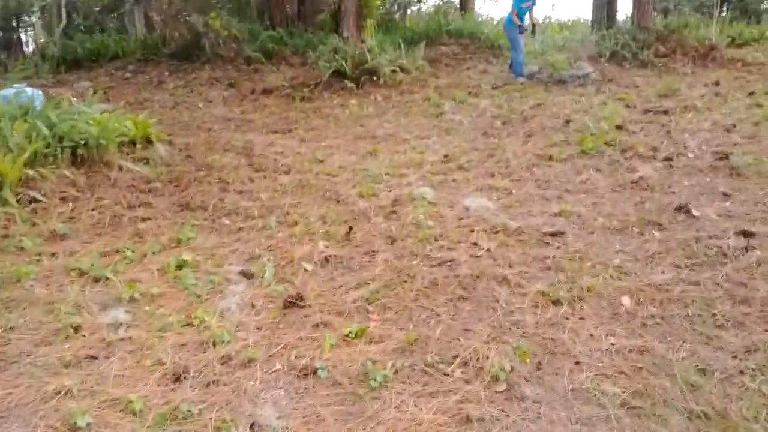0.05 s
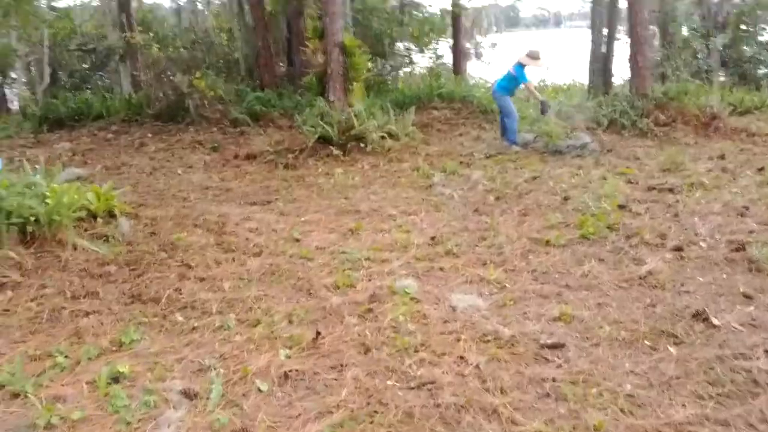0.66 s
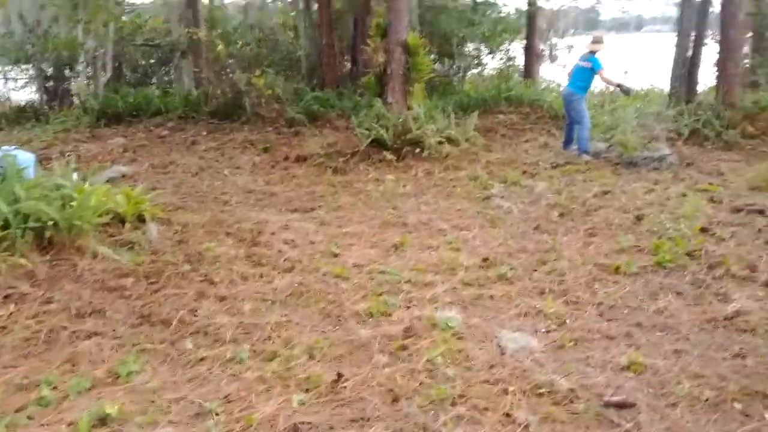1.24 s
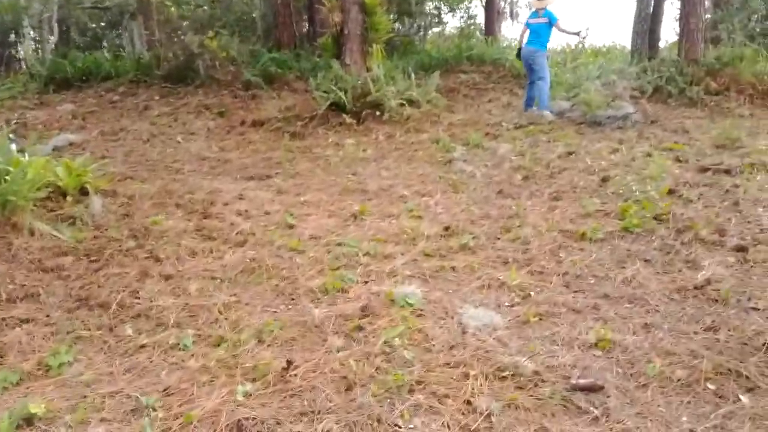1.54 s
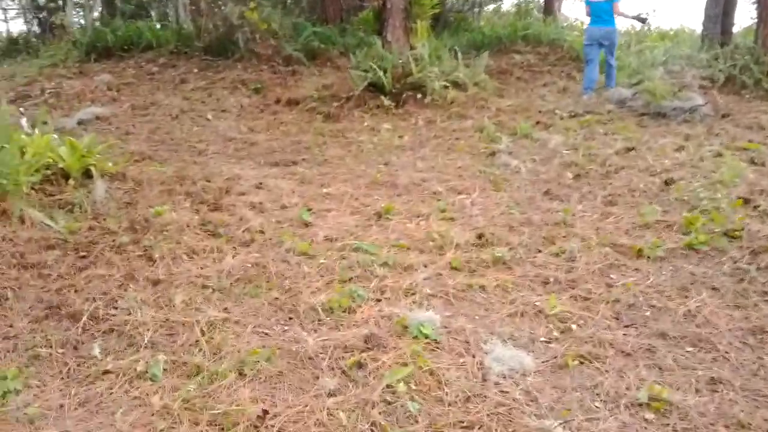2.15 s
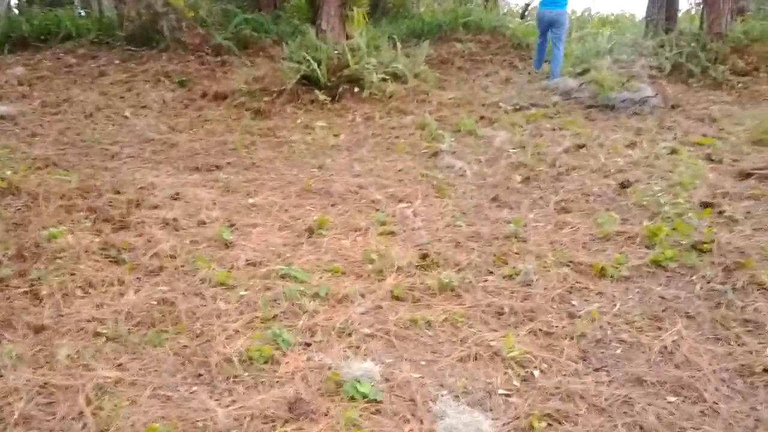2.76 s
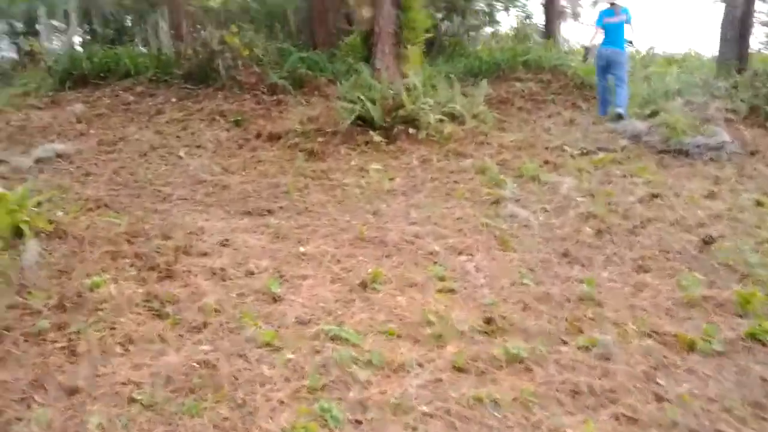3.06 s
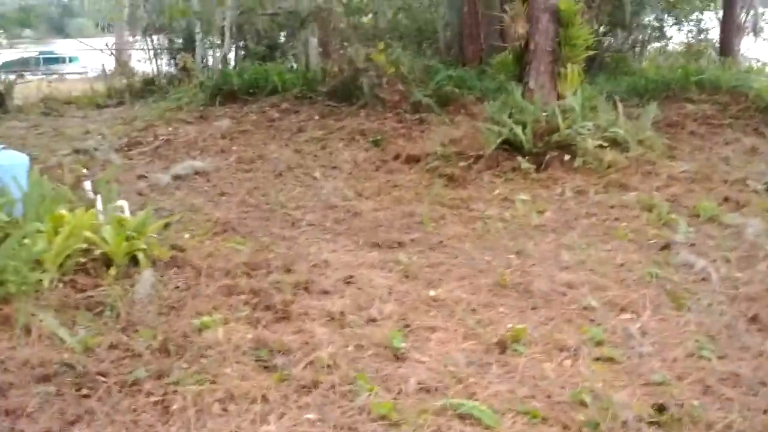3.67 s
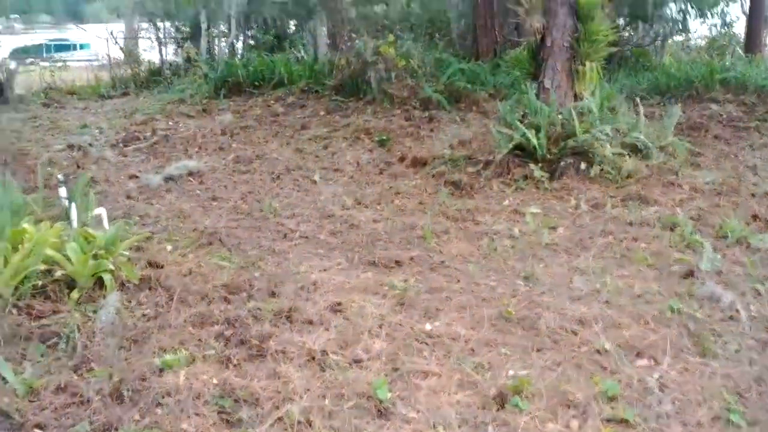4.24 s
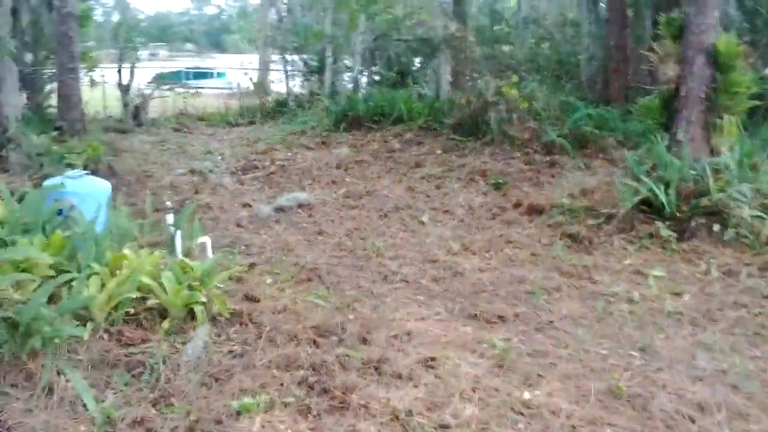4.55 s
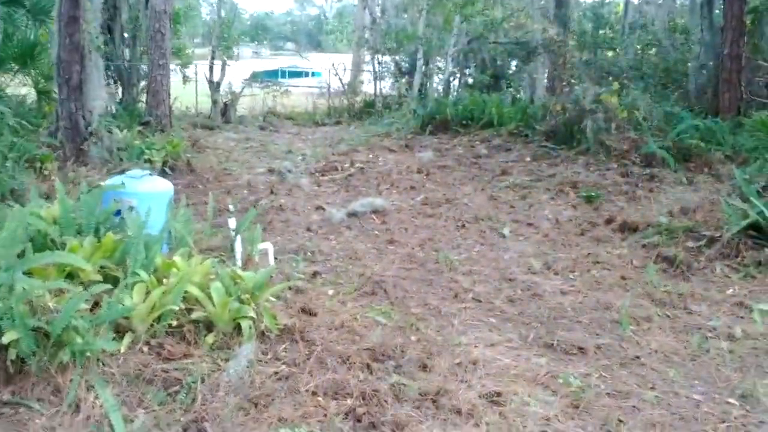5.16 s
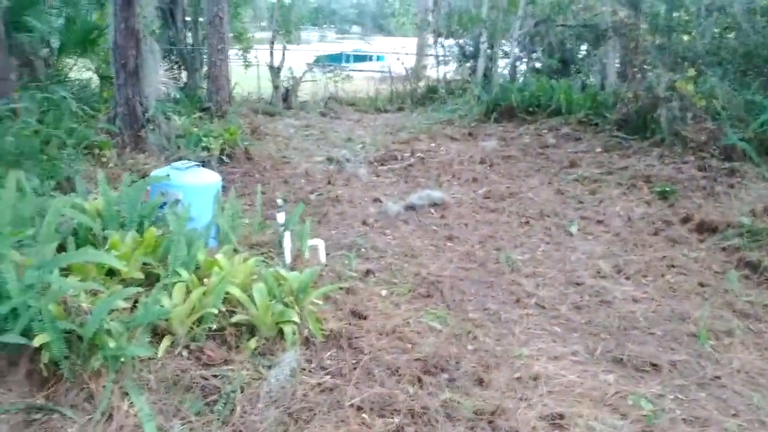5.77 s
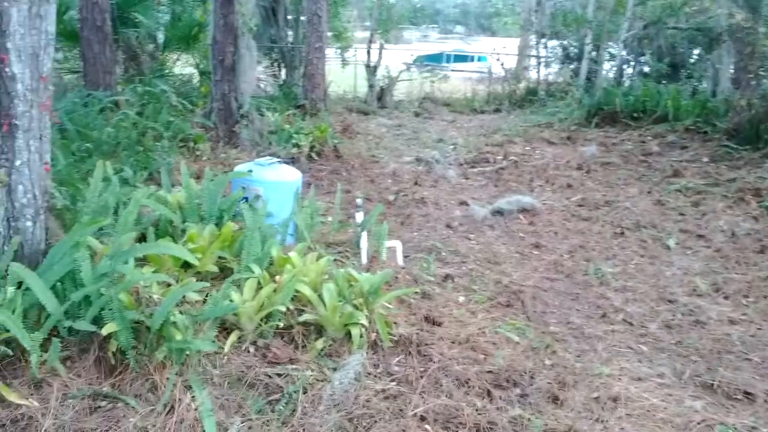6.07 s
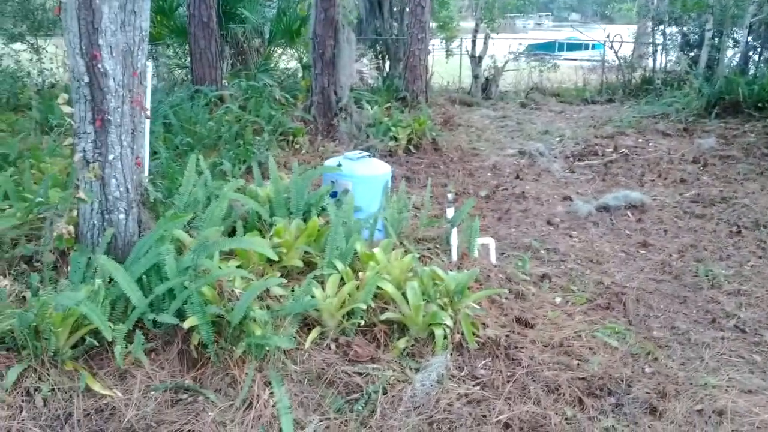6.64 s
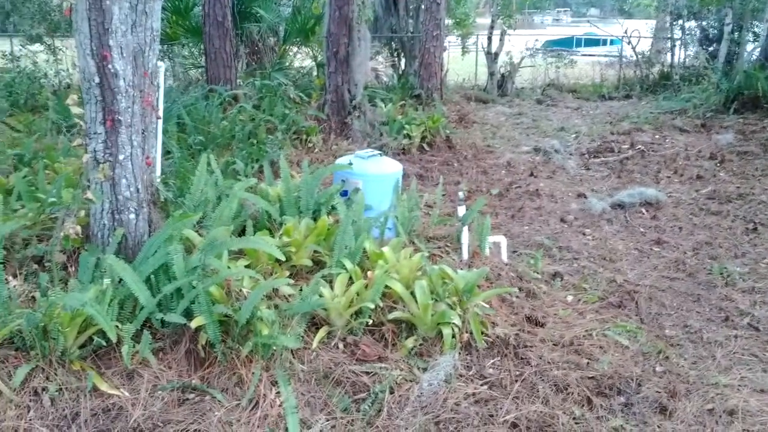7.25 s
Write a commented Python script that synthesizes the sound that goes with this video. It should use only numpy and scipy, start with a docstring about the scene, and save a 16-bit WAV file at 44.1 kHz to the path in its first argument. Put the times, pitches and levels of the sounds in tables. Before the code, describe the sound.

Dry pine needles crackle under someone's slow, steady steps in the open air. Sharp little twig snaps and muffled knocks dot the crunching, and the feet brush through the litter between steps. Near the end a louder scuff swishes through, followed by a few faint ticks. A quiet low rumble lies underneath, with slight wind and soft thumps on the handheld microphone.

```python
"""Slow steps on dry pine needles

Each step in a yard bends countless needles that crackle as they slip, breaks a few twigs and presses
the packed litter into a dull crunch. Buried sticks knock, the sole rasps, and one foot scuffs through
at the end. Light air and jolts of the hand buffet a camera's microphone over a low outdoor rumble."""
import sys
import numpy as np
from scipy import signal
from scipy.fft import rfft, irfft, next_fast_len
from scipy.io import wavfile

SR = 44100
rng = np.random.default_rng(int(sys.argv[2]) if len(sys.argv) > 2 else 0)


def bounce(signal):
    """Save signal as a 16-bit WAV file at the path given by the first command-line argument."""
    frames = np.transpose(np.atleast_2d(signal))
    limited = np.clip(frames, -1, 1)
    pcm = np.round(limited * 32767).astype(np.int16)
    wavfile.write(sys.argv[1], SR, pcm)


N = 331191
TIME = np.arange(N) / SR


def needles(rustle_db, stem_db):
    """Stick-slip friction: harder pressure sets more needles slipping; coarse stems sound lower."""
    # spectra of fine needles and of coarse stems: (frequency [Hz], relative level [dB])
    needle_spectrum = [(1500, -22), (3500, -11), (4700, -5.5), (5800, -4.5), (7000, -1.5), (8500, 0.25),
                       (10300, 2), (12000, -2.5), (14000, -2.5), (16000, -14.5)]
    stem_spectrum = [(300, -14.5), (700, 7.5), (1100, 8), (1550, 4.5), (2000, 6), (2800, 8.5), (4000, 2),
                     (7000, -6.5)]
    slips_per_s = 5500 * undb(1.1 * (rustle_db + 43))
    # one needle giving way frees its neighbours: a sudden rise and a short fall
    t = np.arange(SR // 20) / SR
    releases = np.abs(grains(170, spread_db=0.5, limit_db=2))
    bunches = unit(signal.oaconvolve(releases, np.exp(-t / 0.011))[:N])
    depth = 1 / (1 + (slips_per_s / 11000) ** 2)  # in a fast sweep the bunches merge into a swish
    slips = crackle(slips_per_s, spread_db=4, limit_db=15, splinter=0.27, decay_s=0.000215, kinds=10)
    slips *= np.sqrt(1 - depth + depth * bunches ** 2)
    rubbing = 0.5 * rng.standard_normal(N)  # needles sliding past each other
    cracks = crackle(slips_per_s / 20, spread_db=1, limit_db=15, splinter=0.15, decay_s=0.00032, kinds=4)
    fine = colour(slips + rubbing, needle_spectrum)
    coarse = colour(slips + rubbing + undb(1.5) * cracks, stem_spectrum)
    return undb(rustle_db + 0.28) * fine + undb(stem_db + 1) * coarse


def footwork():
    """Incoherent contacts add in power, giving the drive in dB of needles, stems and packed litter."""
    # footfalls: (touch-down [s], roll of the sole [s], rustle [dB], stems re rustle [dB],
    # lag of the full weight [s], weight held [s], crunch [dB])
    steps = [(0.0, 0.02, -41, -13.5, 0.0018, 0.012, -48), (0.649, 0.038, -42, -12.5, 0.0036, 0.029, -49.5),
             (1.211, 0.0083, -40, -11.5, 0.0086, .08, -53), (1.8, 0.052, -42, -10, .006, 0.049, -51),
             (2.296, 0.11, -39, -16, 0.088, 0.073, -50), (3.045, 0.028, -36.5, -15.5, 0.006, 0.033, -49),
             (3.585, 0.0038, -34, -12, .006, 0.0097, -50.5), (4.173, 0.13, -36.5, -16, 0.0025, 0.29, -52.5),
             (4.909, 0.032, -30.5, -16.5, 0.02, 0.21, -53), (5.8, 0.088, -39, -16.5, .031, .12, -55.5),
             (6.436, 0.0036, -39.5, -22, 0.0097, 0.0086, -51.5)]
    # a foot lifting or sweeping: (crest [s], rise [s], fall [s], rustle [dB], stems re rustle [dB])
    brushes = [(0.495, 0.02, 0.1, -44, -13), (0.82, .05, .05, -52.5, -1), (1.112, .005, 0.19, -42.5, -13),
               (1.645, 0.022, 0.045, -46, -12.5), (1.728, 0.04, 0.053, -39.5, -26),
               (2.0, 0.013, 0.14, -53, -3.5), (2.54, 0.076, 0.041, -41.5, -10.5),
               (2.943, 0.005, 0.046, -34.5, -15.5), (3.28, .08, .09, -46, -9.5),
               (3.383, 0.011, 0.03, -33, -21.5), (3.736, 0.036, 0.03, -40.5, -16),
               (4.041, 0.012, 0.044, -42, -13), (4.47, 0.061, 0.1, -44, -8.5),
               (4.61, 0.043, 0.063, -35, -13.5), (4.679, 0.029, 0.064, -37, -12),
               (4.853, 0.01, 0.06, -36, -14.5), (5.099, 0.032, 0.27, -39.5, -15),
               (5.44, 0.046, 0.12, -48, -19), (5.628, .025, 0.24, -39, -19), (6.029, 0.036, .035, -42, -11),
               (6.289, 0.046, .06, -38, -14), (6.443, 0.057, 0.032, -24.5, -16.5),
               (6.59, 0.011, 0.1, -44, -13)]
    # needles springing back between steps: (time [s], level [dB])
    recovery = [(0, -55), (.35, -58), (1.0, -56), (1.5, -51.5), (2.15, -49.5), (2.8, -50), (3.4, -44),
                (3.95, -50), (5.3, -48.5), (6.15, -45.5), (6.7, -59.5), (7.05, -55.5), (7.2, -87),
                (7.5, -58)]
    stir = undb(np.interp(TIME, *np.transpose(recovery)))
    contacts = [(stir, -14.5)]  # (needle gain, stems re needles [dB])
    loads = [stir * undb(-20)]  # the litter keeps creaking under the stir
    for s, roll_s, db, stems_db, lag_s, held_s, crunch_db in steps:
        contacts.append((undb(db) * swell(s, rise_s=0.026, hold_s=roll_s, fall_s=0.11), stems_db))
        loads.append(undb(crunch_db) * swell(s + lag_s, rise_s=0.034, hold_s=held_s, fall_s=0.1))
    for s, rise_s, fall_s, db, stems_db in brushes:
        contacts.append((undb(db) * swell(s, rise_s, 0, fall_s), stems_db))
    fine = [gain for gain, _ in contacts]
    coarse = [gain * undb(stems_db) for gain, stems_db in contacts]
    return power_db(fine), power_db(coarse), power_db(loads)


def fracture(splinter, decay_s):
    """Brittle fracture: fibres begin to tear, the stem breaks in one impulse, and the spray dies away."""
    t = np.arange(SR // 50) / SR
    tearing = t / decay_s * np.exp(1 - t / decay_s)
    burst = splinter * rng.standard_normal(len(t)) * tearing
    burst[np.argmax(tearing)] += 1
    return burst


def grains(per_s, spread_db, limit_db):
    """Shot noise: random slips, many small and a few large, with mean power near 1 at any rate."""
    chance = np.clip(per_s / SR, 1 / SR, 1)
    size = undb(np.minimum(spread_db * rng.exponential(size=N), limit_db))
    polarity = rng.choice([-1, 1], N)
    slipping = rng.random(N) < chance
    return unit(size * polarity * slipping / np.sqrt(chance))


def crackle(per_s, spread_db, limit_db, splinter, decay_s, kinds):
    """Superposition: slips are shared among kinds of fibre, each with its own impulse response."""
    out = np.zeros(N)
    for _ in range(kinds):
        slips = grains(per_s / kinds, spread_db, limit_db)
        out += signal.oaconvolve(slips, unit(fracture(splinter, decay_s)))[:N]
    return unit(out)


def twigs(rustle_db):
    """Impulse excitation: each break rings as a bright tick; thicker twigs add a woody crack."""
    # larger twigs breaking: (time [s], relative tick peak [dB], centre [Hz], relative wood peak [dB])
    snaps = [(0.1037, -31, 9360, -51), (0.2242, -27, 6450, -38), (0.4324, -31, 9580, -53),
             (1.0931, -11, 11500, -41), (1.0976, -24, 9400, -50), (1.2126, -18, 9600, -49),
             (1.231, -19, 9600, -48), (1.3657, -28, 8390, -42), (1.804, -14, 10700, -40),
             (1.852, -21, 8500, -30.5), (1.8937, -19, 10400, -35), (1.9916, -28, 9050, -36.5),
             (2.4713, -18, 11500, -38), (2.549, -21, 9520, -61), (2.5734, -19, 9720, -61),
             (2.593, -27, 10500, -54), (2.8333, -25.5, 9530, -64), (2.9387, -22, 6540, -48),
             (2.971, -14, 12200, -52), (3.1015, -18, 8000, -32), (3.1487, -20, 7460, -34),
             (3.2096, -16.5, 8100, -40), (3.477, -20.5, 10600, -60), (3.7808, -18, 9000, -30.5),
             (3.8072, -26.5, 9020, -35.5), (4.6732, -12.5, 10500, -44), (4.846, -20, 10100, -50),
             (5.0729, -16, 12300, -31), (5.1317, -14, 9750, -53), (5.17, -20, 8000, -33),
             (5.257, -21, 9400, -51), (5.789, -15.5, 10000, -56), (5.8313, -13, 10000, -44),
             (5.8577, -14, 10000, -54), (5.889, -17, 8500, -51), (5.906, -14.5, 8100, -59),
             (5.967, -11, 8700, -46), (6.0252, -14, 10300, -51), (6.5254, -19, 7100, -38),
             (6.5794, -20.5, 10600, -60), (6.6097, -23, 12700, -61), (6.621, -23.5, 9000, -45),
             (6.6962, -23.5, 10100, -65), (7.0507, -32.5, 8480, -48), (7.2993, -33.5, 9000, -68)]
    out = np.zeros(N)
    thin = signal.butter(2, 6000, "high", fs=SR, output="sos")  # thin fibres radiate only treble
    for s, tick_db, hz, wood_db in list(snaps) + small_twigs(rustle_db):
        burst = fracture(splinter=0.28, decay_s=0.00046)
        tick = signal.sosfilt(thin, resonate(burst, hz, q=2.9) + 0.5 * burst)
        crack = resonate(resonate(burst, 2000, q=1), 2400, q=0.74)
        add(out, s + 0.0006, tick, tick_db + 0.5)
        add(out, s + 0.000665, crack, wood_db + 0.5)
    return out


def small_twigs(rustle_db, per_s=6.8, feet_rest_s=6.7):
    """A random point process: rows of small snaps while the feet move, louder in a strong rustle."""
    when, strength, pitch = rng.random((int(per_s * feet_rest_s), 3)).T
    times = feet_rest_s * when
    over_rustle_db = 12 + 3.5 * (2 * strength - 1)
    tick_db = np.minimum(np.interp(times, TIME, rustle_db) + over_rustle_db, -18)
    hz = 9300 * 2 ** (0.5 * (pitch - 0.5))
    wood_db = tick_db - 25
    return list(zip(times, tick_db, hz, wood_db))


def litter(tread_db):
    """Compaction: the packed layer slips under the sole in a crunch that the shoe muffles."""
    # spectrum of the covered litter: (frequency [Hz], relative level [dB])
    spectrum = [(80, -31), (180, -9), (300, -2.5), (430, 1.5), (620, 1), (850, -8), (1150, -1), (1600, -19),
                (3000, -16)]
    slips = crackle(1500, spread_db=4.5, limit_db=26.5, splinter=0.13, decay_s=0.0007, kinds=5)
    return undb(tread_db + 4) * colour(slips, spectrum)


def buried_sticks():
    """Heavy damping: the soil stops each knock within a few cycles and absorbs its treble."""
    # sticks and cones giving way under the sole: (time [s], relative peak [dB], centre [Hz])
    knocks = [(0.092, -34, 567), (0.631, -30.5, 1130), (0.82, -28.5, 960), (1.09, -28.5, 1150),
              (1.228, -28, 541), (1.247, -33, 388), (1.275, -24.5, 480), (1.801, -31, 412),
              (1.85, -28, 660), (2.375, -36, 471), (2.437, -30, 743), (2.465, -42, 530),
              (3.149, -26.5, 675), (3.192, -36, 770), (3.746, -27, 864), (3.778, -30, 1100),
              (4.463, -30, 1070), (4.67, -28.5, 1070), (5.114, -32, 716), (5.982, -18.5, 510)]
    out = np.zeros(N)
    for s, db, hz in knocks:
        ring = resonate(fracture(splinter=0.061, decay_s=0.00072), hz, q=2.35)
        soil = signal.butter(2, 3.4 * hz, fs=SR, output="sos")
        add(out, s + 0.00289, signal.sosfilt(soil, ring), db - 2)
    return out


def scuffs():
    """Stick-slip friction of the sole gives brief rasps, each with its own pitch."""
    # the sole rubbing over the litter: (time [s], half-width [s], centre [Hz], level [dB])
    rubs = [(1.306, 0.014, 430, -44), (1.818, 0.028, 430, -46), (2.199, 0.0067, 1970, -49.5),
            (3.563, 0.03, 1780, -47.5), (4.322, 0.04, 424, -46.5), (6.422, 0.061, 1890, -48.5),
            (6.433, 0.062, 6600, -38)]
    out = np.zeros(N)
    for s, half_s, hz, db in rubs:
        slips = grains(900, spread_db=13.5, limit_db=29)
        rasp = resonate(resonate(slips, hz, q=4.4), hz, q=0.74)
        out += unit(rasp) * undb(db) * gaussian(s, half_s)
    return out


def jolts():
    """Structure-borne sound: a jolt of the hand reaches the microphone as a soft, low thump."""
    # jolts of the camera: (time [s], peak [dB], frequency [Hz])
    thumps = [(0.288, -39.5, 92), (1.19, -29, 40.4), (3.72, -39, 94), (4.02, -44, 68.5), (4.116, -40, 60)]
    out = np.zeros(N)
    t = np.arange(SR // 8) / SR
    for s, db, hz in thumps:
        envelope = t * np.exp(-t * hz / 0.21)
        add(out, s, -envelope * np.sin(2 * np.pi * hz * t), db)
    return out


def outdoor_air(calm_db=-58.5):
    """Turbulence: slow eddies press on the microphone, over a distant rumble whose level wanders."""
    # puffs of air: (time [s], half-width [s], level [dB])
    gusts = [(.33, 0.16, -51.5), (1.2, 0.2, -47), (2.42, .22, -53.5), (3.205, 0.13, -56),
             (3.743, 0.044, -48.5), (4.096, 0.24, -53.5), (4.365, 0.033, -57), (6.745, 0.07, -58),
             (7.087, .05, -53), (7.453, .03, -49.5)]
    # spectra of the rumble and of the eddies: (frequency [Hz], relative level [dB])
    yard_spectrum = [(60, -3), (115, 0.5), (170, -2), (280, -1), (500, -0.5), (750, -3), (1100, -6),
                     (1600, -11.5), (3000, -23.5), (8000, -14.5), (16000, -18.5)]
    eddy_spectrum = [(10, -1), (22, 1), (45, -4.5), (70, -2), (100, -12), (160, -43), (400, -35.5)]
    puffs = sum(undb(db) * gaussian(s, half_s) for s, half_s, db in gusts)
    wander_db = 0.5 * wander(2.67) + 0.5 * wander(14)
    rumble = colour(rng.standard_normal(N), yard_spectrum) * undb(-55.5 + wander_db)
    eddies = colour(rng.standard_normal(N), eddy_spectrum) * np.hypot(puffs, undb(calm_db))
    return rumble + eddies


def undb(db):
    """Amplitude ratio of a level in decibels."""
    return 10 ** (np.asarray(db) / 20)


def unit(x):
    """Normalisation to rms 1."""
    return x / np.sqrt(np.mean(x ** 2))


def power_db(gains):
    """Power summation: the level in dB of unrelated sounds heard together."""
    return 10 * np.log10(sum(gain ** 2 for gain in gains) + 1e-18)


def swell(s, rise_s, hold_s, fall_s):
    """Exponential growth up to time s, a hold, and exponential decay."""
    return np.exp(-np.maximum(s - TIME, 0) / rise_s - np.maximum(TIME - s - hold_s, 0) / fall_s)


def gaussian(s, half_s):
    """Gaussian envelope, down to 1/e at half_s either side of time s."""
    return np.exp(-((TIME - s) / half_s) ** 2)


def wander(knots_per_s):
    """Slow random fluctuation of rms 1."""
    knots = rng.standard_normal(8192)
    return unit(np.interp(TIME * knots_per_s, np.arange(len(knots)), knots))


def colour(x, spectrum):
    """Minimum-phase filtering shapes the spectrum while clicks keep their sharp front; rms 1."""
    hz, db = np.transpose(spectrum)
    size = next_fast_len(N + SR // 2, True) * 2
    bins_hz = np.maximum(np.fft.rfftfreq(size, 1 / SR), 1)
    gain = undb(np.interp(np.log(bins_hz), np.log(hz), db))
    cepstrum = irfft(np.log(gain))
    cepstrum[1:size // 2] *= 2  # folding onto positive time makes the filter causal
    cepstrum[size // 2 + 1:] = 0
    response = np.exp(rfft(cepstrum))
    return unit(irfft(rfft(x, size) * response)[:N])


def resonate(x, hz, q):
    """Forced response of one damped resonance."""
    return signal.lfilter(*signal.iirpeak(hz, q, fs=SR), x)


def add(track, s, sound, peak_db):
    """Superpose a sound on a track at a time and a peak level."""
    start = int(s * SR)
    part = sound[:N - start] / np.max(np.abs(sound))
    track[start:start + len(part)] += undb(peak_db) * part


def scene():
    """Free field: in the open air every sound arrives directly, summed in one channel."""
    rustle_db, stem_db, tread_db = footwork()
    underfoot = needles(rustle_db, stem_db) + litter(tread_db) + scuffs() + twigs(rustle_db)
    return (underfoot + buried_sticks() + jolts() + outdoor_air())[None]


def record(dry):
    """Band limiting: the camera cuts the treble above 16 kHz."""
    return signal.sosfilt(signal.ellip(10, 0.2, 70, 16000, fs=SR, output="sos"), dry)


dry = scene()
out = record(dry)
bounce(out)
```